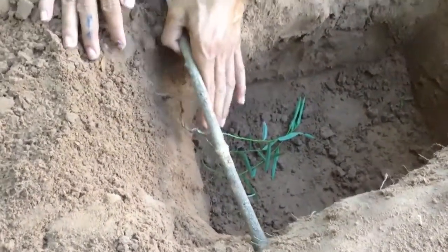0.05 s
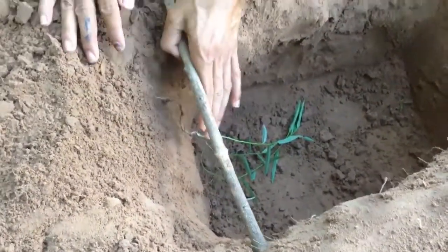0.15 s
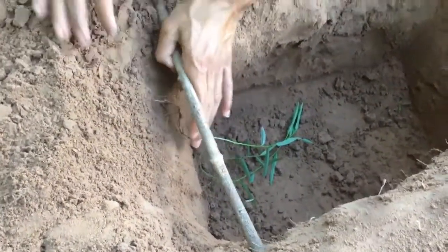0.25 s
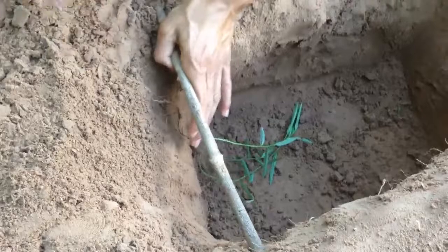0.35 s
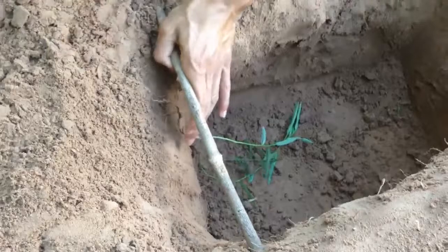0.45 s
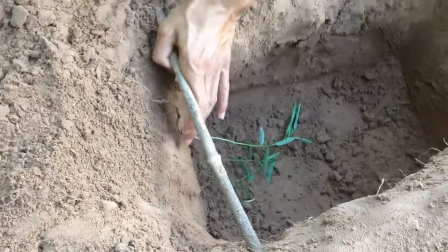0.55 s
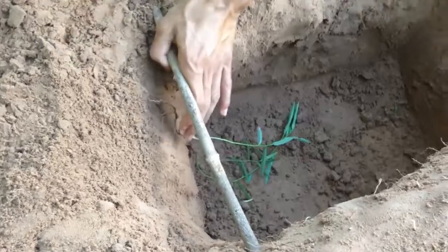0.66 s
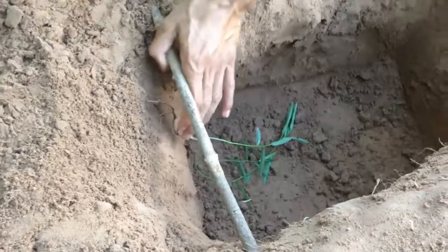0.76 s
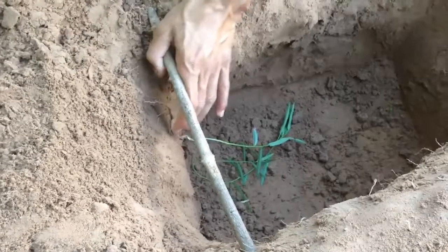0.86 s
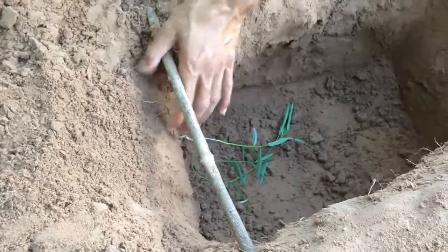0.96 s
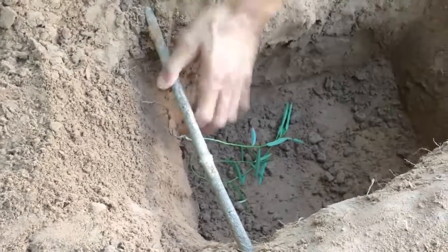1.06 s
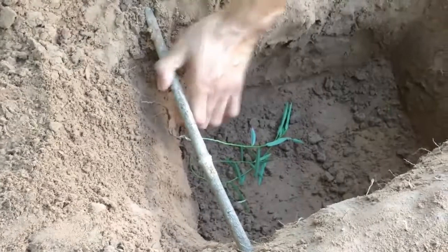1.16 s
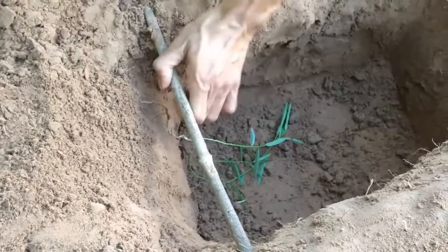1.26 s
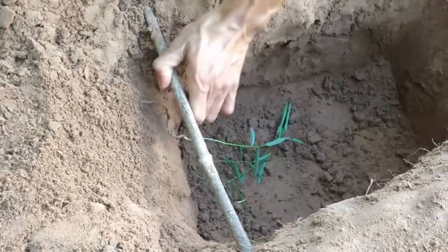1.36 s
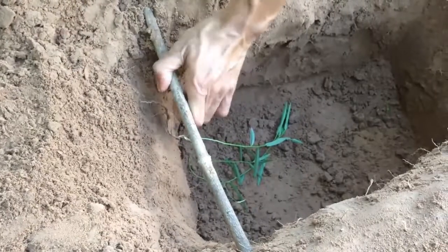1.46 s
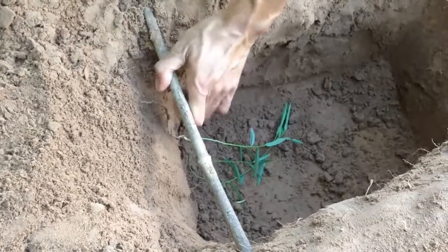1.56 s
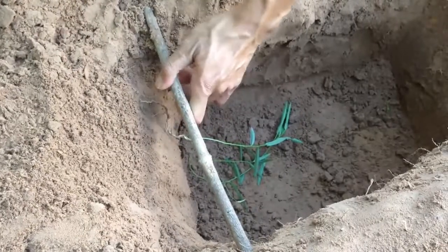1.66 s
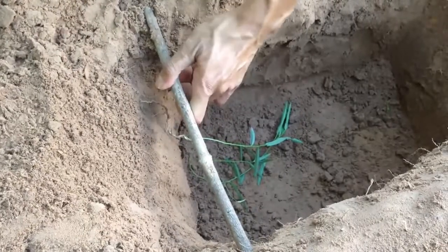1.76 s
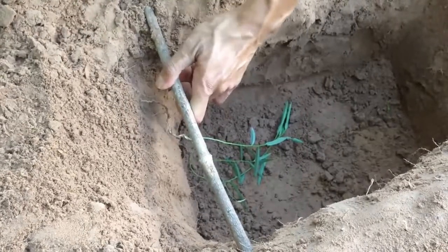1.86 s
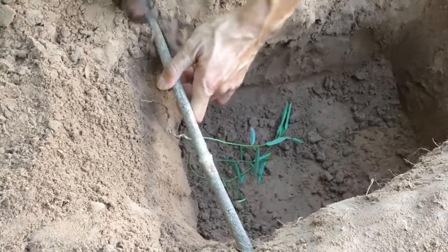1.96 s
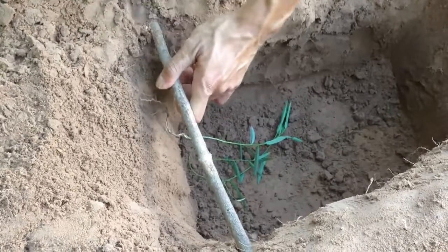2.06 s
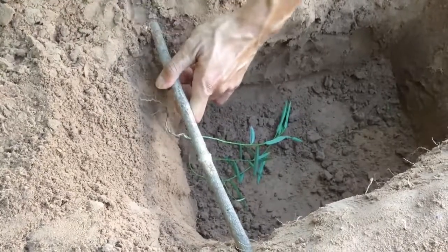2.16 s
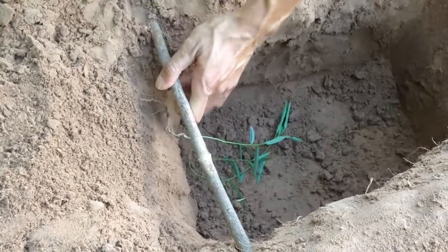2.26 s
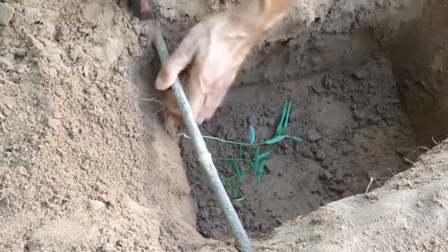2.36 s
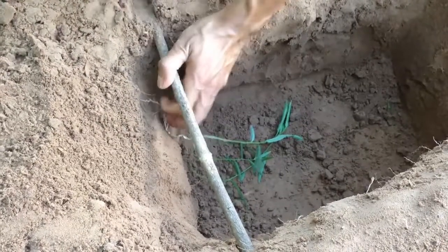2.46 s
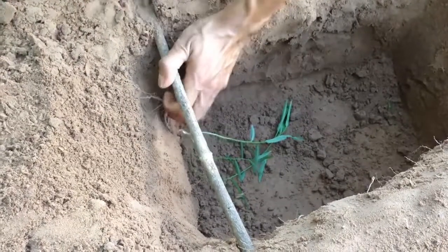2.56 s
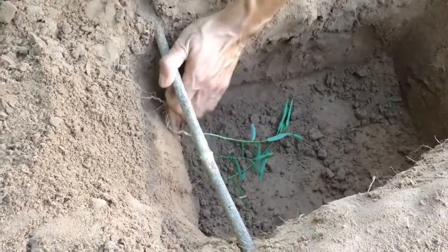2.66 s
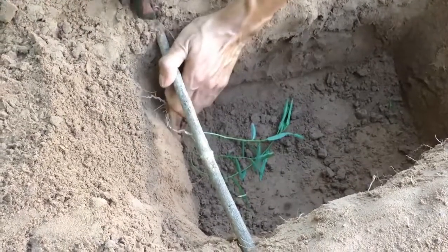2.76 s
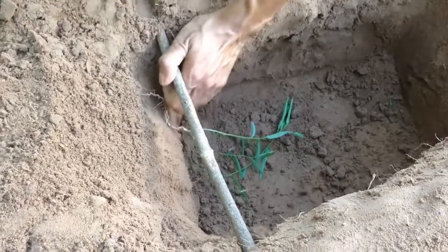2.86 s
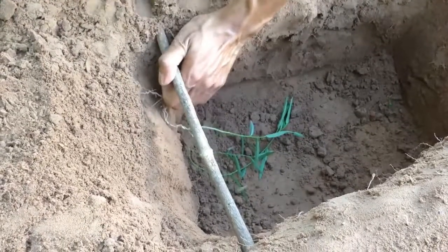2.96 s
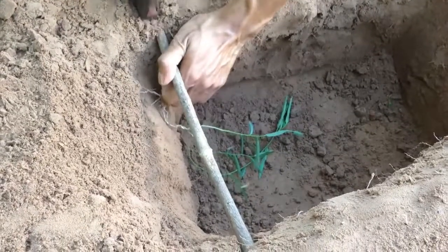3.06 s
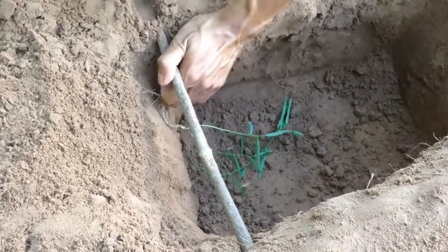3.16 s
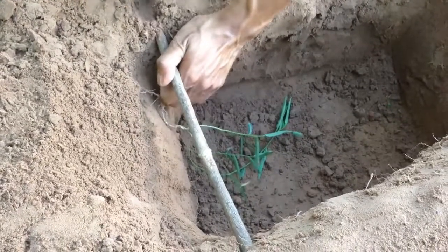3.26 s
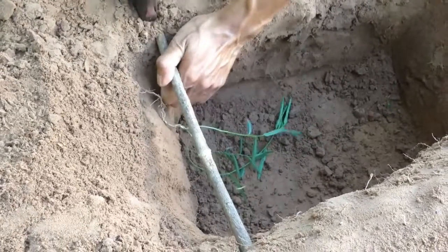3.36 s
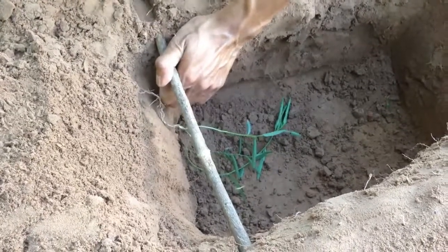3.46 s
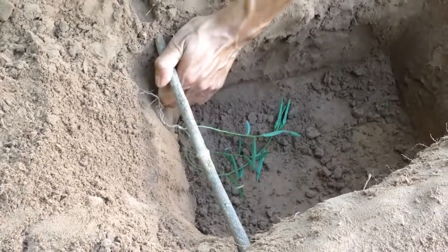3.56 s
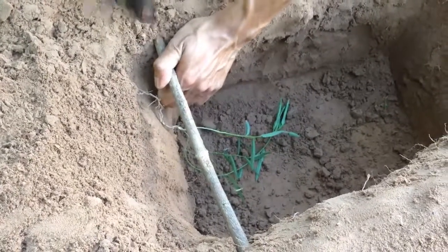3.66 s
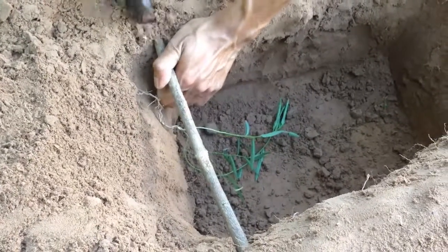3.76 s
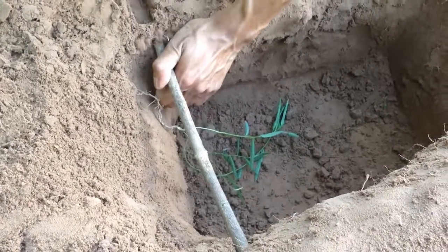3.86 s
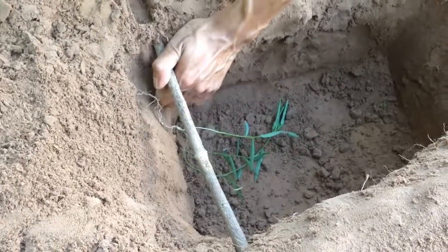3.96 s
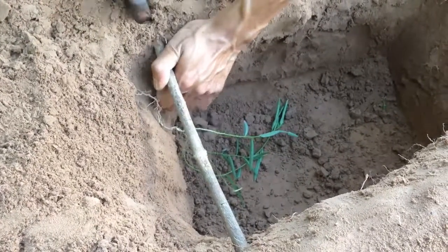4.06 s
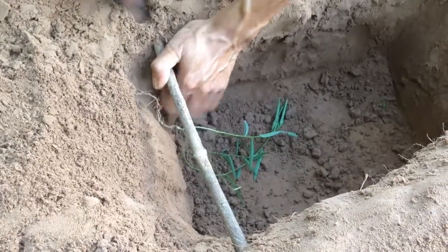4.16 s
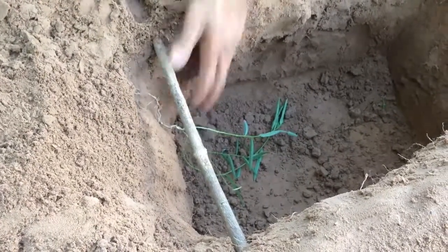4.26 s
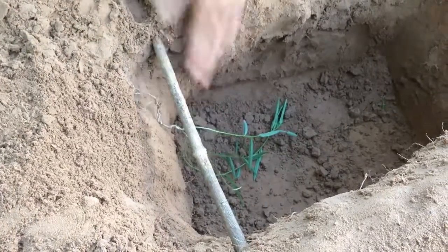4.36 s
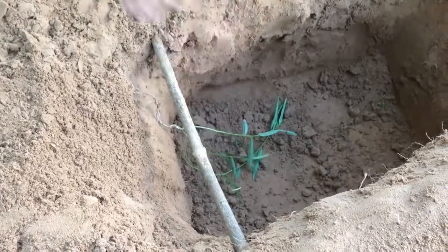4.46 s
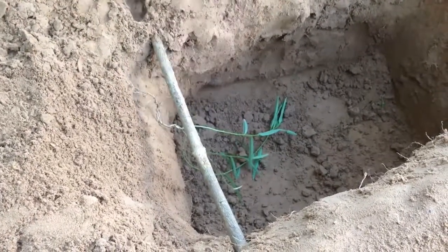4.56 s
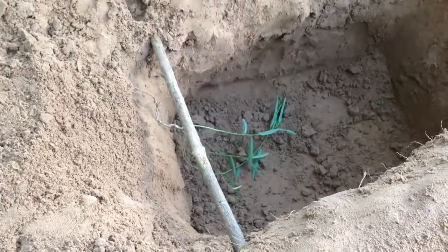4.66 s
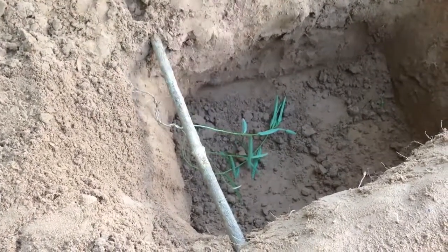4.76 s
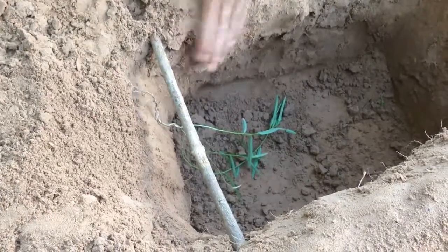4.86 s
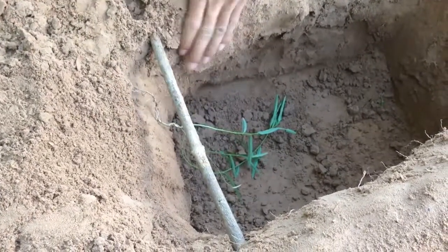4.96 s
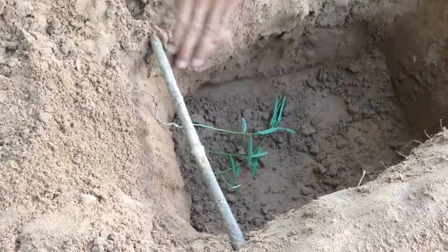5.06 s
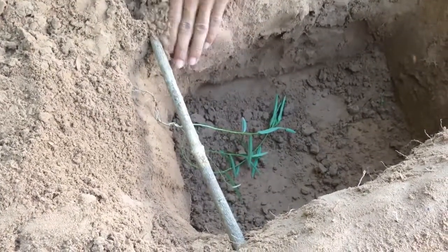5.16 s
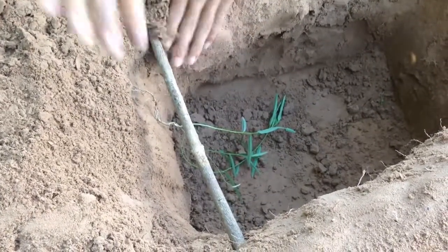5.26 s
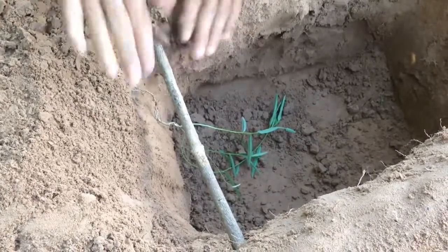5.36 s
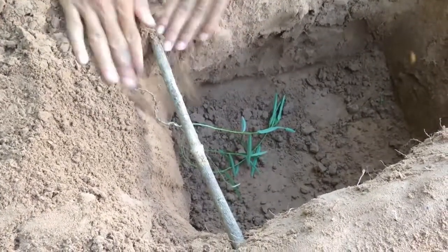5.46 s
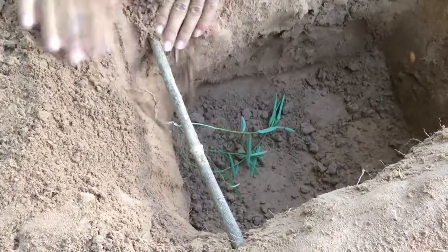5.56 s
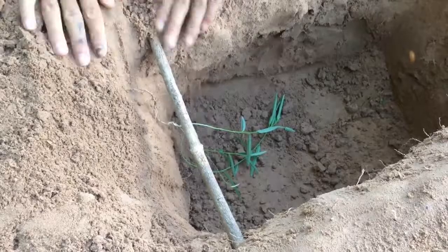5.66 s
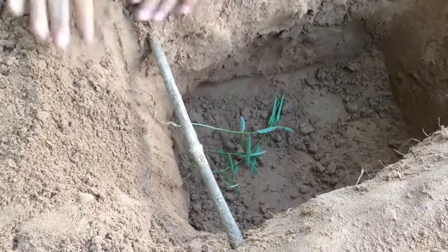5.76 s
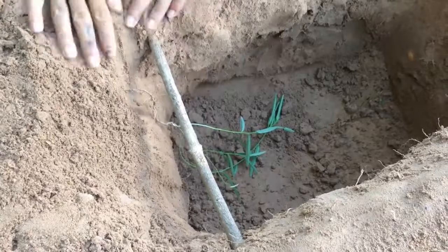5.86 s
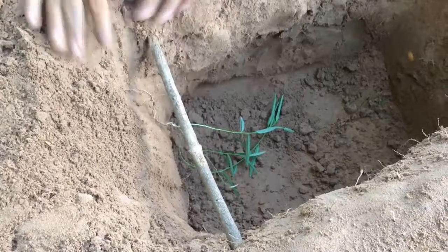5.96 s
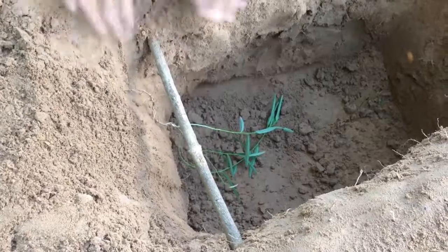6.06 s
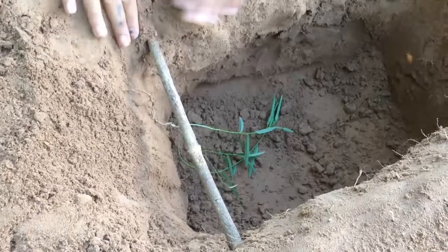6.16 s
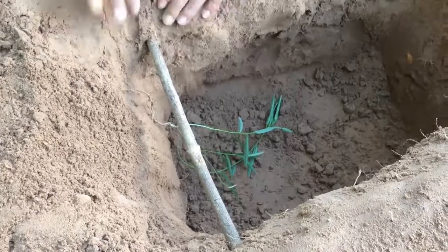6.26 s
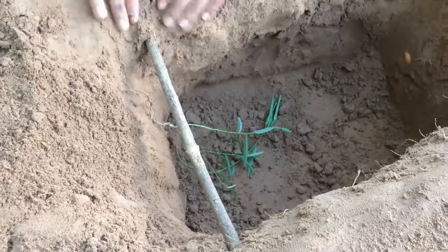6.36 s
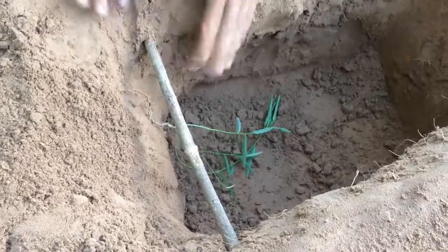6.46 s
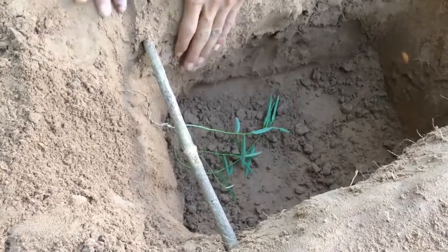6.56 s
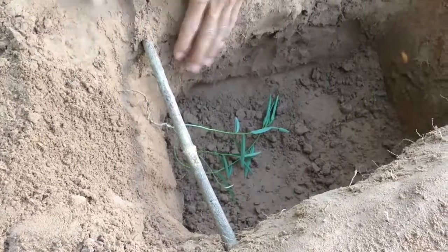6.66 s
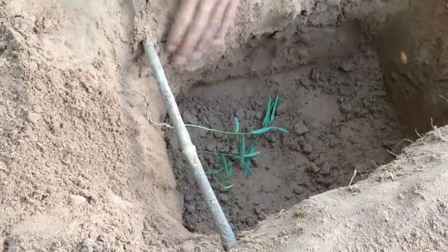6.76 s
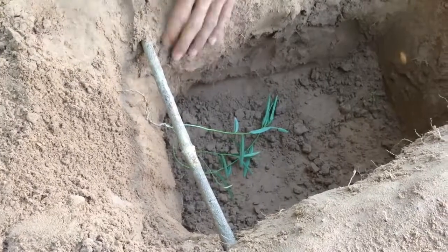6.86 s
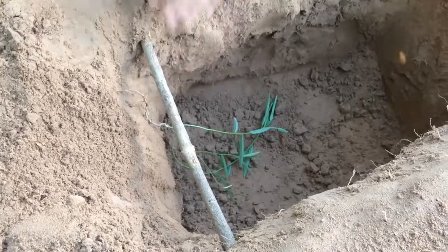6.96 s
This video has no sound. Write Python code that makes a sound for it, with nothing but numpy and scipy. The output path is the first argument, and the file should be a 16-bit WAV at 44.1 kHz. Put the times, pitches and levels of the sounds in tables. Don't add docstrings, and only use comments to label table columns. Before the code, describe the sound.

A close, bass-light microphone outdoors catches a dug pit under steady soft air hiss and very faint distant insect bands. From 0 to 2 seconds, fingers brush dry sand, crumble small clods and lightly nudge a thin pipe, with small dull taps clustered around 0.4 to 0.6. At about 2.2 a weak hammer blow lands, then six much louder ones at 2.6, 3.0, 3.3, 3.6, 4.0 and 4.3. Each is a short, hollow, low-mid thump with a woody click, a little crunch and a brief answer from the pit wall; the second is crunchiest and brightest. From 4.5, hands rustle through sand. A faint pat at 5.2 precedes a loud cupped slap at 5.7, softer pats at 5.9 and 6.15, another firm one at 6.4, then lighter, higher pats at 6.6 and 6.8, with grit settling into quiet hiss by 7.

```python
import sys
import numpy as np
from scipy import signal
from scipy.fft import rfft, irfft, next_fast_len
from scipy.io import wavfile
from scipy.ndimage import map_coordinates

SR = 44100
rng = np.random.default_rng(int(sys.argv[2]) if len(sys.argv) > 2 else 0)


def volts(x):
    e = np.asarray(x, float) / 20
    return 10 ** e


def int16_out(signal):
    q = np.round(np.clip(np.atleast_2d(signal).T, -1, 1) * 32767)
    wavfile.write(sys.argv[1], SR, q.astype(np.int16))


N = 308700
T = np.arange(SR // 6) / SR

# (time [s], thump pitch [Hz], thump level [dB], crunch level [dB], top level [dB])
HAMMER_BLOWS = [
    (2.2300, 195, -8.7, -24, -35),
    (2.6248, 205, -1.5, -15, -23.5),
    (3.0099, 220, -0.5, -21, -28.5),
    (3.3088, 219, 1.5, -20, -33.5),
    (3.6045, 221, 0.6, -18, -36),
    (3.9646, 222, 1.2, -25.5, -33.5),
    (4.3125, 220, 1, -21, -35.5),
]
# (square hit [dB], sideways slip [dB], twist [dB], bite on the rim [dB])
BLOW_LANDINGS = [
    (-21.5, -28.5, -23, -40),
    (-19, -34, -29, -15.5),
    (-16, -11, -25, -16.5),
    (-17.5, -18, -19, -24.5),
    (-18, -20.5, -14.5, -26.5),
    (-11, -28, -16.5, -17),
    (-17, -24, -24, -26),
]
# (pitch [Hz], level [dB], t60 [s])
PIPE_MODES = [
    [(452, 8.5, 0.025)],
    [(842, 9.5, 0.024)],
    [(1130, 11, 0.017)],
    [(1360, 0, 0.024)],
    [(2040, 4, 0.015), (2390, 4, 0.015)],
    [(3530, 12, 0.007), (4230, 3.5, .009), (5100, -5, 0.017)],
]
# (time [s], peak [dB], thump pitch [Hz], contact [s], push [dB])
PALM_PATS = [(5.179, -25, 197.5, 0.013, -46), (5.6885, -12, 170, 0.0068, -30),
             (5.6947, -24, 196, 0.013, -50), (5.9076, -38.5, 170, 0.0065, -60),
             (5.9141, -27.5, 159, 0.011, -44), (6.149, -33, 170, 0.0064, -58),
             (6.1549, -20, 160, 0.012, -53.5), (6.4027, -14, 149, 0.0128, -42),
             (6.621, -31.5, 262, .004, -60.5), (6.6254, -21, 250, .005, -24),
             (6.633, -22, 191, 0.0071, -44), (6.823, -30, 404, 0.003, -60), (6.8266, -19, 210, 0.0071, -34)]
# (time [s], hollow [dB], slap [dB], grit pitch [Hz], grit level [dB])
PALM_SLAPS = [
    (5.179, -51, -50, 3500, -54),
    (5.688, -17, -19.5, 3350, -24.5),
    (5.914, -38, -48, 2600, -45),
    (6.1556, -29, -36, 3350, -39.5),
    (6.4018, -18, -28, 3450, -27),
    (6.626, -24, -36, 2220, -30),
    (6.8248, -39, -29.5, 2330, -46),
]
# (time [s], peak [dB], thump pitch [Hz], slap [dB], grit [dB])
FINGER_TOUCHES = [(0.150, -34, 225, -47, -62), (0.368, -49, 328, -56, -61), (0.424, -44, 213, -62, -69),
                  (0.4375, -26.5, 221, -39, -58), (0.469, -43, 187, -66, -66), (0.517, -37, 196, -44, -60),
                  (0.550, -33, 198, -50, -52), (0.57, -40, 610, -52, -58), (0.884, -56, 480, -61, -65),
                  (0.993, -50, 237, -55, -68), (1.258, -53, 360, -55, -64), (1.384, -35.5, 283, -67, -58),
                  (1.997, -51.5, 310, -72, -60), (3.244, -36, 247, -71.5, -59),
                  (5.011, -52.5, 280, -63, -58.5), (5.793, -35.5, 249, -64.5, -59),
                  (6.0655, -35.5, 310, -62, -63)]
# (middle [s], length [s], sand level [dB], dust over sand [dB])
SAND_SWEEPS = [(.055, .07, -67, 1.5), (.14, .07, -70, 3), (.35, .2, -72, 2.5), (.57, .1, -64, 1.2),
               (.69, .12, -69, 3), (.87, .14, -64, 1.2), (1.06, .2, -66, -.7), (1.28, .26, -64.5, -1.5),
               (1.5, .08, -63, .7), (1.64, .18, -69, -.7), (1.76, .025, -64, 6), (1.82, .045, -61, 2.5),
               (1.97, .22, -70, 1.5), (4.55, .03, -63, -12), (4.67, .13, -63, -9), (4.79, .13, -66, -7),
               (4.905, .1, -62, 3.5), (5.09, .16, -72, -4), (5.25, .15, -61.5, 1.5), (5.38, .11, -63, 3),
               (5.56, .2, -71, -3)]
# (middle [s], length [s], level [dB])
CRUMBLING_CLODS = [(.125, .03, -61), (.162, .03, -54), (.21, .06, -63), (.355, .05, -63), (.445, .045, -53),
                   (.548, .064, -49), (.65, .13, -64), (.9, .12, -66), (.995, .05, -61), (1.25, .1, -61),
                   (1.45, .3, -73), (2.0, .1, -72), (4.8, .3, -76), (5.02, .05, -65), (5.29, .12, -67),
                   (6.085, .04, -62), (6.96, .05, -64)]
# (time [s], level [dB], pitch [Hz], length [s])
GRAIN_SCRAPES = [
    (0.86, -57, 4000, 0.016),
    (0.888, -53.5, 2360, 0.0081),
    (1.504, -60, 11600, 0.022),
    (1.816, -55, 4900, .01),
    (1.825, -59, 3300, .012),
    (1.82, -61, 11000, 0.0069),
]
# (frequency [Hz], density [dB per Hz])
EARTH_COLOUR = [(18, -44.5), (30, -9), (112, -21.5), (195, -6.5), (478, -14), (619, -11), (802, -22.5),
                (1040, -19), (3500, -39.5), (4550, -62), (7700, -120)]
# (frequency [Hz], density [dB per Hz])
SAND_COLOUR = [(880, -47.5), (1500, -6), (2020, 0), (2900, -1), (3040, 0.5), (6420, -6), (7500, -12),
               (9750, -31.5), (16500, -120)]
# (frequency [Hz], density [dB per Hz])
DUST_COLOUR = [(3820, -39.5), (6500, -8.5), (10300, 5), (13200, -3.5), (15200, -6.5), (15800, -17),
               (16000, -57)]
# (frequency [Hz], t60 [s])
PIT_DECAY = [(150, 0.16), (500, .06), (2000, .04), (6000, 0.057), (14000, 0.01)]
# (frequency [Hz], density [dB per Hz])
AIR_COLOUR = [(15, -33.5), (25, -12.5), (48, -4.5), (206, -3), (309, -5.5), (531, -10.5), (1070, -13),
              (1230, -14), (1330, -16.5), (1440, -19.5), (2910, -13.5), (6740, -16), (12200, -10),
              (14800, -17.5), (16000, -36)]
# (time [s], level [dB])
HISS_DRIFT = [(0.0, -63), (0.53, -63), (0.9, -63), (2.42, -60.5), (2.84, -59.5), (3.02, -62.5), (3.63, -63),
              (4.33, -63.5), (4.99, -62), (7.0, -60.5)]
# (centre [Hz], width [Hz], level [dB])
INSECT_BANDS = [(2160, 350, -74.5), (3110, 67, -78.5), (4460, 300, -75)]


def unit(x):
    return x / np.sqrt(np.mean(x ** 2) + 1e-20)


def along(points, hz):
    f, v = np.transpose(points)
    return np.interp(np.log(hz + 1), np.log(f + 1), v)


def noise(gain, grain_db=0):
    m = next_fast_len(N)
    grain = volts(grain_db * np.minimum(rng.exponential(size=m), 4))
    white = rng.standard_normal(m) * grain
    return unit(irfft(rfft(white) * gain(np.fft.rfftfreq(m, 1 / SR)), m)[:N])


def add(track, s, sound):
    track[round(s * SR):][:len(sound)] += sound


def thump(hz, contact, rise, choke):
    return np.sin(2 * np.pi * hz * T) * (1 - np.exp(-T / rise)) * np.exp(-(T / contact) ** choke)


def ring(modes, spread_db, rise, flip=1):
    out = np.zeros(len(T))
    for i, (hz, db, t60) in enumerate(modes):
        strength_luck, pitch_luck = rng.standard_normal(2)
        decay = volts(db + spread_db * strength_luck - 60 * T / t60)
        out += flip ** i * decay * np.sin(2 * np.pi * hz * (1 + .012 * pitch_luck) * T)
    return out * (1 - np.exp(-T / rise))


def puff(lo_hz, hi_hz, t60, rise):
    sos = signal.butter(2, [lo_hz, hi_hz], "band", fs=SR, output="sos")
    burst = unit(signal.sosfilt(sos, rng.standard_normal(len(T))))
    return burst * volts(-60 * T / t60) * (1 - np.exp(-T / rise))


def hammer():
    out = np.zeros(N + SR)
    swings = 2.55
    for k, (blow, landing) in enumerate(zip(HAMMER_BLOWS, BLOW_LANDINGS)):
        s, hz, thump_db, crunch_db, top_db = blow
        square_db, slip_db, twist_db, rim_db = landing
        strengths = square_db - 3, square_db, slip_db, twist_db, square_db - 1.8, rim_db
        rebound_db = thump_db - 10 - 1.05 * k
        add(out, s - .0006, volts(thump_db) * thump(hz, contact=swings / hz, rise=.0024, choke=4.6))
        add(out, s + .0122, -volts(rebound_db) * thump(.8 * hz, contact=.008, rise=.0012, choke=3.2))
        add(out, s + .014, volts(thump_db - 37) * puff(130, 300, t60=.15, rise=.004))
        add(out, s + .004, volts(slip_db - 17) * puff(500, 1500, t60=.065, rise=.003))
        for db, group in zip(strengths, PIPE_MODES):
            add(out, s, volts(db) * ring(group, spread_db=2, rise=.00057, flip=-1))
        trickle_db = (crunch_db + square_db) / 2 - 27
        add(out, s, volts(crunch_db) * puff(500, 4500, t60=.016, rise=.0004) / 2)
        add(out, s, volts(trickle_db) * puff(900, 5000, t60=.09, rise=.004))
        add(out, s, volts(top_db + 2) * puff(4600, 14000, t60=.014, rise=.0002))
    return out[:N]


def pats():
    out = np.zeros(N + SR)
    for s, db, hz, contact, push_db in PALM_PATS:
        rise = .0011 * volts(-.6 * (db + 20))
        press = volts(db) * thump(hz, contact, rise, choke=3.9)
        push = volts(push_db) * thump(100, contact=.014, rise=.007, choke=2.1)
        add(out, s, press + push)
        spring = -volts(db - 19.5) * thump(.96 * hz, contact=.014, rise=.0025, choke=1.76)
        add(out, s + contact + .0019, spring)
    return out[:N]


def slaps():
    out = np.zeros(N + SR)
    for s, hollow_db, slap_db, grit_hz, grit_db in PALM_SLAPS:
        slap_hz = 840 - 3.5 * (hollow_db + 16)
        modes = [(455, hollow_db, .035), (slap_hz, slap_db + 10, .015), (grit_hz, grit_db + 8, .01)]
        add(out, s, ring(modes, spread_db=0, rise=.001))
        add(out, s, volts(hollow_db - 9.5) * puff(210, 570, t60=.053, rise=.0014))
        add(out, s, volts(slap_db - 14.5) * puff(670, 1250, t60=.041, rise=.00067))
        add(out, s, volts(grit_db - 4) * puff(1500, 4600, t60=.025, rise=.00048))
        add(out, s, volts(grit_db - 18.5) * puff(5000, 16000, t60=.017, rise=.0005))
    return out[:N]


def touches():
    out = np.zeros(N + SR)
    for s, db, hz, slap_db, grit_db in FINGER_TOUCHES:
        contact = max(.006 - .0002 * (db + 35), .002)
        add(out, s, volts(db) * thump(hz, contact, rise=.0021, choke=3.2))
        add(out, s + .002, volts(slap_db + 3) * puff(400, 1300, t60=.025, rise=.0015))
        add(out, s + .0036, volts(grit_db) * puff(1500, 5700, t60=.088, rise=.0023))
    return out[:N]


def strokes(rows):
    t, power = np.arange(N) / SR, np.zeros(N)
    edge, trail = 4, 1.05
    stumble_per_s, stumble_db = 60, 2.5
    for s, length, db in rows:
        near = slice(max(round((s - 2 * length) * SR), 0), round((s + 2 * length) * SR))
        u = 2 * (t[near] - s) / length
        u = np.where(u > 0, u / trail, u)
        power[near] += volts(2 * db) * np.exp(-np.abs(u) ** edge)
    stumble = map_coordinates(rng.standard_normal(N // 400), [t * stumble_per_s])
    return np.sqrt(power) * volts(stumble_db * stumble - 1)


def brushing():
    sand_rows = [(s, length, db) for s, length, db, _ in SAND_SWEEPS]
    dust_rows = [(s, length, db + fine_db) for s, length, db, fine_db in SAND_SWEEPS]
    earth = strokes(CRUMBLING_CLODS) * noise(lambda f: volts(along(EARTH_COLOUR, f)), grain_db=3)
    sand = strokes(sand_rows) * noise(lambda f: volts(along(SAND_COLOUR, f)), grain_db=2.5)
    dust = strokes(dust_rows) * noise(lambda f: volts(along(DUST_COLOUR, f)), grain_db=4.5)
    return earth + sand + dust


def scrapes():
    out = np.zeros(N + SR)
    for s, db, hz, length in GRAIN_SCRAPES:
        swell = np.exp(-((T - .05) / length) ** 2)
        add(out, s - .05, volts(db) * puff(.95 * hz, 1.07 * hz, t60=9, rise=.001) * swell)
    return out[:N]


def pit(x):
    out = np.zeros(N + SR)
    block = SR // 4
    for start in range(0, N, block):
        hz, t, z = signal.stft(rng.standard_normal(block), SR, nperseg=256)
        decay = volts(-60 * t / along(PIT_DECAY, hz)[:, None])
        tail = signal.istft(z * decay, SR, nperseg=256)[1]
        answer = signal.fftconvolve(x[start:start + block], tail / np.linalg.norm(tail))
        add(out, start / SR + .014, answer)
    return volts(-37.5) * out[:N]


def field():
    t = np.arange(N) / SR
    insects = np.zeros(N)
    for hz, width, db in INSECT_BANDS:
        insects += volts(db) * noise(lambda f: np.exp(-((f - hz) / width) ** 2))
    hiss = noise(lambda f: volts(along(AIR_COLOUR, f)))
    flutter_per_s, flutter_db = 9, .8
    flutter = map_coordinates(rng.standard_normal(N // 400), [t * flutter_per_s])
    drift_db = np.interp(t, *np.transpose(HISS_DRIFT)) + 1.4
    return volts(drift_db + flutter_db * flutter) * hiss + insects


def scene():
    contacts = hammer() + pats() + slaps() + touches()
    return (contacts + pit(contacts) + scrapes() + brushing() + field())[None]


def shadow(x):
    low = signal.sosfilt(signal.butter(6, 3000, fs=SR, output="sos"), x)
    low = low + volts(4) * signal.sosfilt(signal.butter(2, 1800, "high", fs=SR, output="sos"), low)
    out = np.zeros(N + SR)
    block = SR // 4
    for start in range(0, N, block):
        lead = (rng.standard_normal(len(T)) * volts(-60 * T / .035))[::-1]
        add(out, start / SR, signal.fftconvolve(low[start:start + block], lead / np.linalg.norm(lead)))
    return volts(-21) * out[len(T):len(T) + N]


def roll_off(x):
    return signal.sosfilt(signal.butter(12, 16470, fs=SR, output="sos"), x)


def record(dry):
    x = dry + shadow(dry[0])
    x = signal.sosfilt(signal.butter(1, 70, "high", fs=SR, output="sos"), x)
    x = x / (1 + np.abs(x / 1.01) ** 8) ** (1 / 8)
    x = signal.sosfiltfilt(signal.butter(12, 15500, fs=SR, output="sos"), x)
    return roll_off(x)


dry = scene()
out = record(dry)
int16_out(out)
```